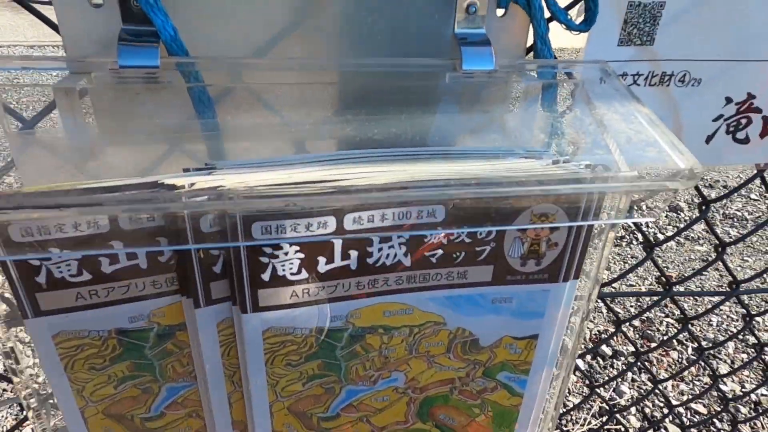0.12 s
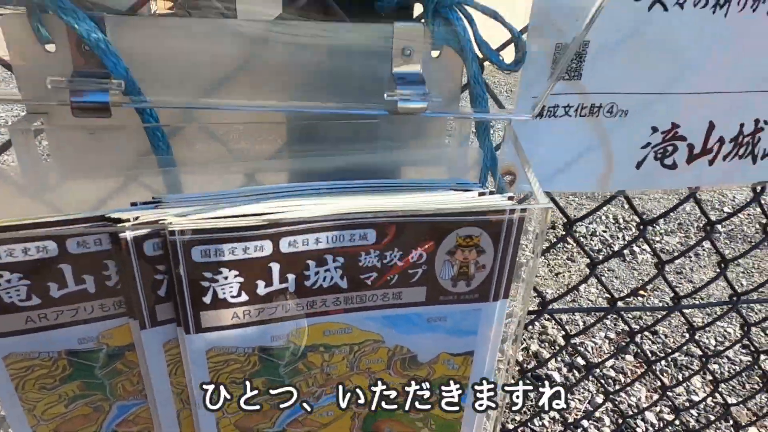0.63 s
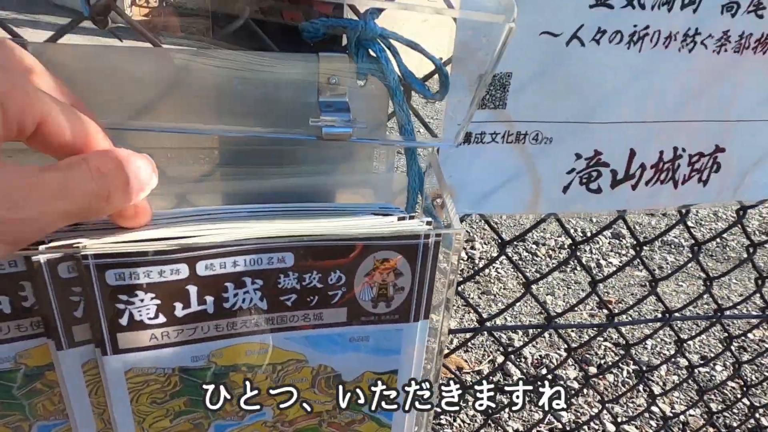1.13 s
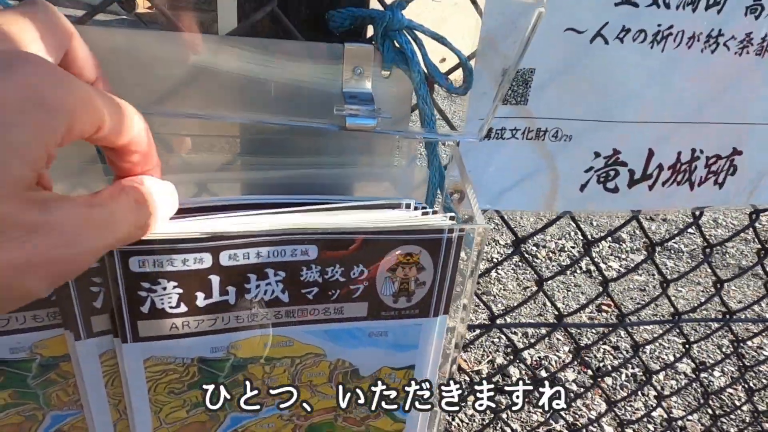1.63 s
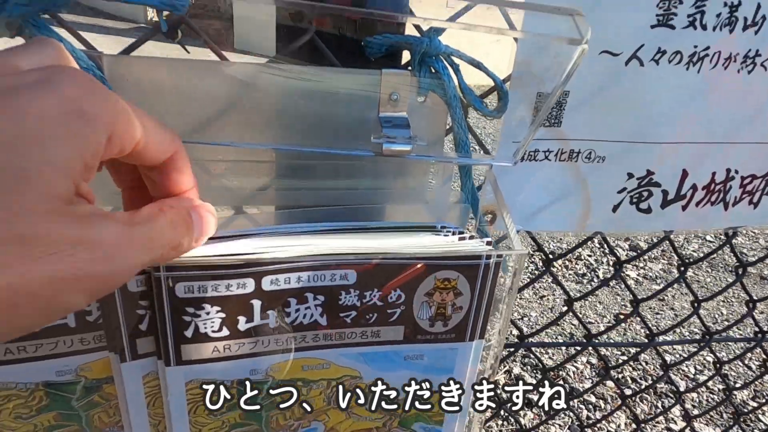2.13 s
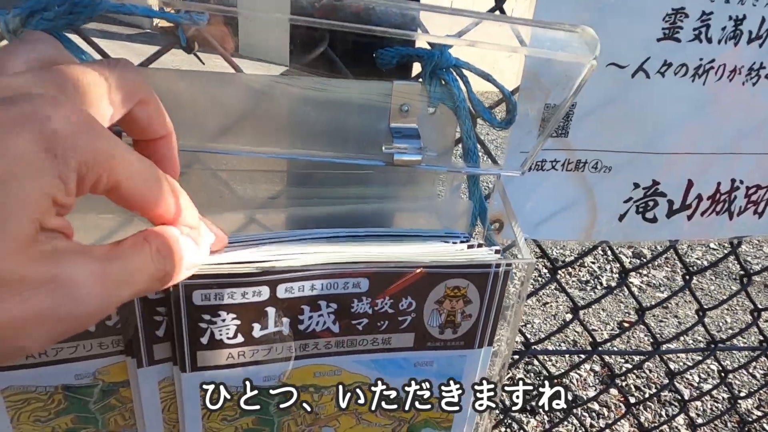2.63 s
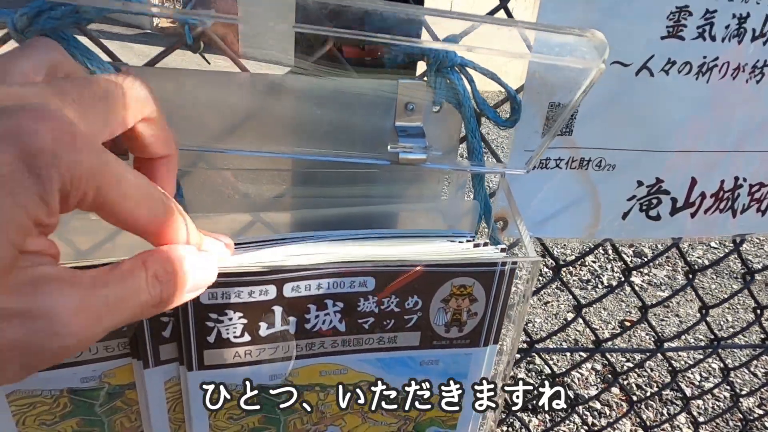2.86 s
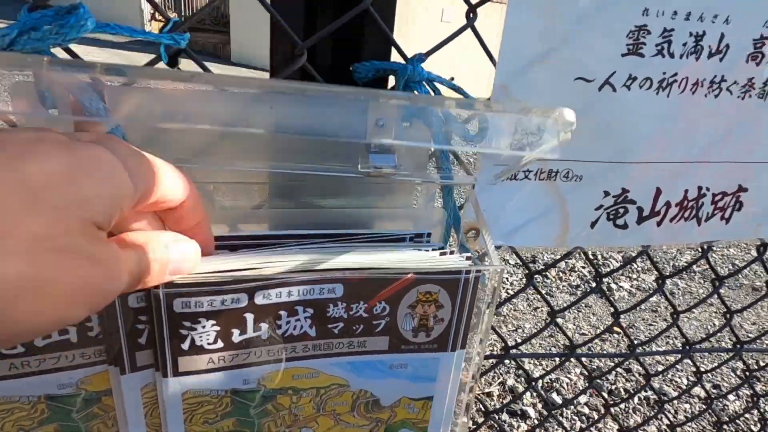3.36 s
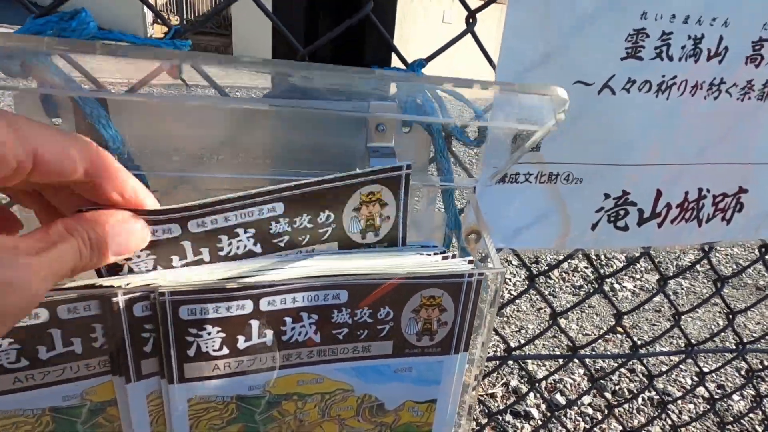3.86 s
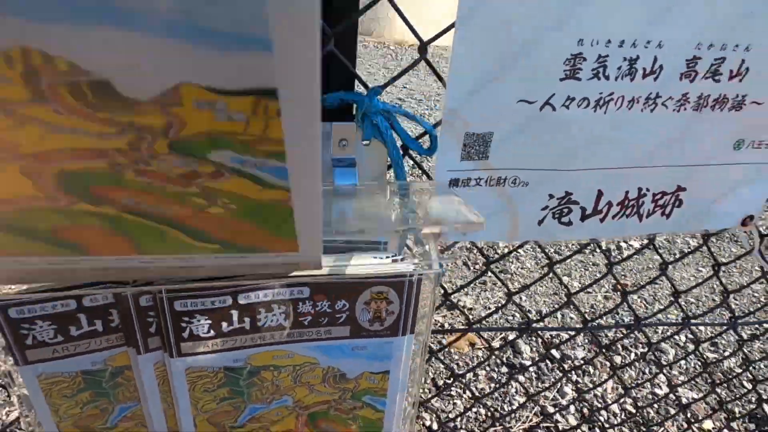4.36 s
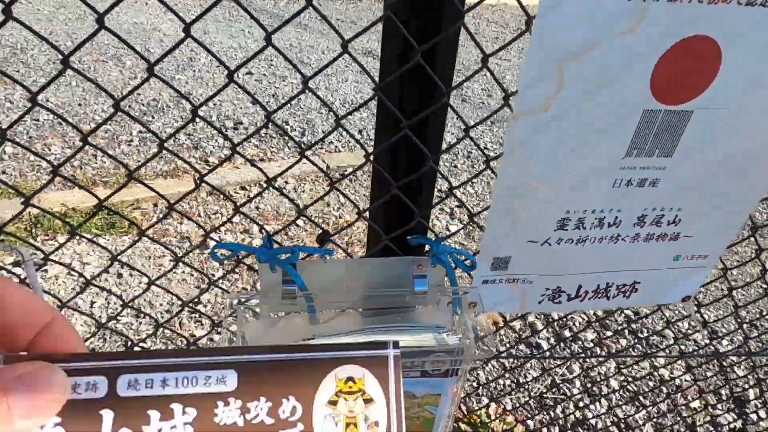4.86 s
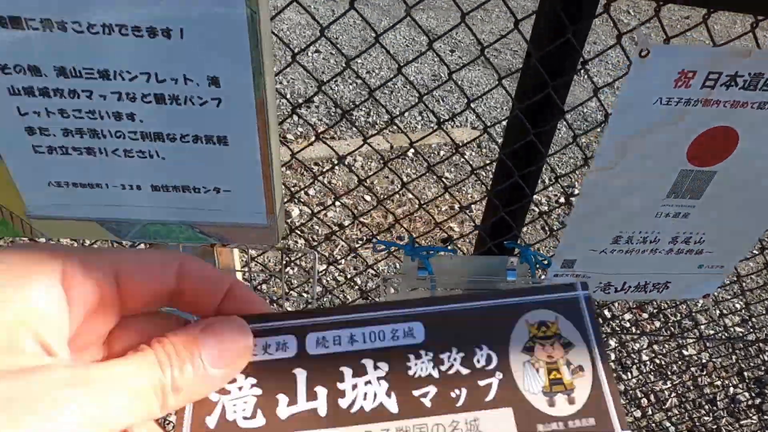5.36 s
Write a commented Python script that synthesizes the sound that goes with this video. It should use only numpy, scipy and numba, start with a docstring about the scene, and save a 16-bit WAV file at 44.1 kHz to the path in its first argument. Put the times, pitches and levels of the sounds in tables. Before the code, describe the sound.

Hollow plastic knocks and dry clicks as a leaflet is pulled from a lidded holder, over soft wind and a distant hum.

```python
"""Leaflet pulled from a lidded plastic box

A hand lifts the lid of a clear leaflet holder tied to a wire fence, fingers the stack and pulls a leaflet out.
Knocks ring decaying box modes; short dry clicks are filtered pulses; gritty noise slides, scrunches and scrapes.
Noise through moving resonances makes an edge chatter, the lid buzz and a hinge squeak and creak.
Underneath, filtered noise gives light wind on the microphone ports, a far motor hum and traffic wash.
"""
import sys
import numpy as np
from scipy import signal
from scipy.fft import rfft, irfft
from scipy.io import wavfile
from scipy.ndimage import uniform_filter1d
from numba import njit

SR = 44100
rng = np.random.default_rng(int(sys.argv[2]) if len(sys.argv) > 2 else 0)


def dump_mix(stems):
    """Bounce the given channels to the path in sys.argv[1] as a 16-bit WAV at rate SR."""
    frames = np.atleast_2d(stems).T  # one column per channel
    limited = np.clip(frames, -1, 1)  # hard clip at full scale
    pcm = np.round(limited * 32767).astype(np.int16)
    wavfile.write(sys.argv[1], SR, pcm)


def decibels_to_gain(level_db):
    """Convert a level in decibels to a linear amplitude gain (20 dB per decade)."""
    exponent = np.asarray(level_db, float) / 20
    return 10 ** exponent


N = 242550
T = np.arange(N) / SR

# wind on the ports: time_s, buffet_db, rumble_db
WIND = [(0, -41.5, -45), (.65, -44.5, -44), (.95, -64, -45), (1.45, -41.5, -50), (2.25, -47.5, -48),
        (2.65, -37.5, -50.5), (3.05, -41.5, -53), (3.4, -41, -45), (3.6, -43, -44), (3.85, -48.5, -45.5),
        (4.4, -41, -41.5), (4.55, -29.5, -42), (4.72, -39.5, -46), (4.95, -51.5, -49), (5.5, -46, -50)]
# far motor: time_s, pitch_hz, level_db
HUM = [(0, 233.6, -57), (.4, 214.2, -45.5), (1.3, 216.3, -50), (2.6, 252, -50.5), (3.6, 254, -71)]
# traffic wash spectrum, relative: freq_hz, density_db_per_hz
WASH = [(250, -17.5), (400, -15), (700, -29), (1100, -12.5), (1600, -20), (2600, -36.5), (7500, -40.5),
        (12000, -49.5)]
# jolts that set the loose lid buzzing on its hinges: time_s, low_ring_db, high_ring_db
LID_JOLTS = [(0.6, -57, -44.5), (0.714, -34.5, -39.5), (1.019, -47, -47.5)]
# thin hinge creak: time_s, pitch_hz, level_db
CREAK = [(3.12, 1090, -74), (3.18, 1223, -49.5), (3.24, 1120, -60), (3.31, 1095, -66)]
# skin or paper along the plastic: start_s, length_s, rub_db, hiss_db
STROKES = [(0.185, 0.17, -55, -63), (0.426, 0.344, -56.5, -61.5), (0.835, 0.378, -57.5, -63),
           (1.374, 0.046, -58, -64), (1.868, 0.23, -57.5, -71), (2.304, 0.051, -56, -62.5),
           (2.578, 0.0091, -52, -64), (3.238, 0.35, -62, -66), (3.737, 0.032, -57.5, -50),
           (3.874, 0.34, -52, -51.5), (4.286, 0.018, -34, -32.5), (4.382, 0.062, -47, -38.5),
           (4.486, 0.045, -45, -34), (4.647, 0.32, -52, -58.5), (5.02, 0.54, -56.5, -59.5)]
# rub resonances, relative levels: centre_hz, width_hz, level_db
RUB_PEAKS = [(1150, 1100, 1.5), (1694, 600, -25)]
# hiss resonances, relative levels: centre_hz, width_hz, level_db
HISS_PEAKS = [(3820, 1900, 11), (6360, 17000, 12)]
# leaflet scrunching against the box: loudest_s, level_db, width_s, centre_hz, glide_octaves_per_s
SCRUNCHES = [(2.197, -47, 0.025, 1400, -7), (3.522, -29.5, 0.016, 800, -12), (4.293, -32, 0.019, 1070, -5),
             (4.535, -22.5, 0.022, 2130, 0), (4.555, -27.5, 0.016, 865, -64), (4.613, -33, 0.02, 670, 6),
             (5.279, -30, 0.022, 1150, 8), (5.457, -26.5, 0.023, 995, -22)]
# box bumping the fence: start_s, level_db, pitch_hz
THUDS = [(0.686, -19.5, 107), (1.811, -12, 410), (1.821, -15.5, 120), (1.827, -13, 384),
         (1.926, -20.5, 109), (1.967, -16, 208), (2.616, -31, 390), (3.176, -30, 109), (3.521, -24.5, 219),
         (3.558, -27.5, 196), (3.755, -29.5, 345), (3.833, -26, 108), (4.284, -20, 215), (4.55, -17.5, 345),
         (4.572, -20.5, 131), (4.599, -22, 224)]
# the sliding leaflet's own band, climbing as less of it is left in the box: time_s, centre_hz, level_db
PULL = [(4.33, 5600, -62), (4.42, 6050, -44), (4.55, 6950, -40.5), (4.575, 7300, -65)]
# short dry clicks and ticks: start_s, peak_db, band_hz
CLICKS = [(0.868, -32.5, 3500), (2.047, -18.5, 1700), (2.06, -22.5, 1584), (2.348, -31, 2500),
          (2.497, -36.5, 1010), (2.586, -39, 3500), (3.446, -36.5, 900), (3.741, -29, 4000),
          (4.271, -23, 2000), (4.95, -30.5, 5000), (5.167, -30.5, 1500), (5.274, -24.5, 3000),
          (5.319, -24.5, 1300), (2.408, -34.5, 1000), (2.452, -26, 1090), (2.537, -31.5, 2500),
          (3.501, -23, 1883), (3.51, -17, 2200), (4.208, -10.5, 2500), (4.411, -8.5, 2500),
          (4.548, -9.5, 2400)]
# knocks on the box: start_s, peak_db, crack_db, spot_hz (pitch of the struck spot)
KNOCKS = [(0.405, -42, -32.5, 1550), (0.481, -18.5, -23, 818), (0.569, -31.5, -35.5, 1420),
          (0.611, -29, -32, 1480), (0.68, -17, -11.5, 1093), (0.695, -18.5, -38, 1065),
          (0.706, -28, -21, 1190), (0.727, -31, -31, 1085), (0.737, -31, -45, 2530),
          (0.764, -30.5, -37, 2530), (0.79, -26, -40, 1067), (0.801, -39, -38, 2530),
          (0.951, -35.5, -36, 1150), (0.974, -31.5, -26, 1160), (1.013, -27.5, -43, 724),
          (1.124, -32.5, -41.5, 1176), (1.2, -29, -28, 2210), (1.236, -38.5, -61, 1130),
          (1.411, -39, -42.5, 1580), (1.764, -37, -40, 1270), (1.808, -16.5, -21, 1043),
          (1.813, -10, -11, 1160), (1.897, -29.5, -33.5, 1020), (1.925, -26.5, -36, 1096),
          (1.942, -32, -40.5, 2500), (1.964, -10, -10, 1080), (1.968, -15, -42, 2600),
          (1.983, -25, -51, 1094), (2.077, -19, -31, 1920), (2.086, -32, -40, 1515),
          (2.616, -36.5, -41, 1150), (3.177, -33.5, -33.5, 1070), (3.468, -31, -35, 897),
          (3.473, -33.5, -29, 1480), (3.519, -18, -44, 733), (3.554, -21.5, -33, 700),
          (3.747, -30, -30, 1670), (3.83, -12, -14.5, 2760), (3.906, -26, -32, 1640),
          (4.052, -8.5, -19.5, 2220), (4.057, -9, -20.5, 2500), (4.132, -20, -13.5, 1530),
          (4.152, -27, -24.5, 2500), (4.208, -11.5, -14, 1150), (4.212, -10, -37, 2270),
          (4.222, -14, -37, 683), (4.281, -12.5, -15, 1020), (4.294, -10.5, -11.5, 1120),
          (4.313, -17, -16.5, 750), (4.344, -26.5, -50, 1950), (4.411, -16.5, -20, 1310),
          (4.639, -37, -34, 4100), (4.751, -39, -49, 4090) ]
# box modes, relative levels, decay before damping: mode_hz, level_db, undamped_t60_s
BOX_MODES = [(726.5, -2, 0.22), (959, -4, 0.23), (1111, -3, 0.12), (1480, 5.5, 0.012), (1954, -1.5, 0.011),
             (2220, -10, 0.028), (2500, 10.5, 0.024), (3122, -8, 0.074), (3325, 4, 0.014),
             (4060, 10.5, 0.02)]
# left minus right port: freq_hz, difference_db
PORTS = [(300, -1), (1200, -1), (2500, 1.5), (5000, -1.5), (10000, -3)]
# fluttering part, opposite in sign on the two ports: freq_hz, level_db
FLUTTER = [(200, -25), (2000, -12.5), (5000, -7.5), (10000, -10)]
# microphone response: freq_hz, gain_db
MIC = [(7500, -1), (8500, -11.5), (13000, -10), (16000, -23.5)]


def unit(x):
    """Scale to rms 1."""
    return x / np.sqrt(np.mean(x ** 2) + 1e-30)


def curve(rows):
    """Columns of a table, interpolated over time."""
    time_s, *columns = np.transpose(rows)
    return [np.interp(T, time_s, column) for column in columns]


def colour(x, points):
    """Weight a spectrum by (Hz, dB) points joined over log frequency."""
    hz, db = np.transpose(points)
    freq_hz = np.fft.rfftfreq(len(x), 1 / SR) + 1
    gain = decibels_to_gain(np.interp(np.log(freq_hz), np.log(hz), db))
    return irfft(rfft(x) * gain, len(x))


def band(x, lo_hz, hi_hz):
    """Band-pass, 12 dB per octave each side."""
    return signal.sosfilt(signal.butter(2, [lo_hz, hi_hz], "band", fs=SR, output="sos"), x)


@njit
def svf(x, hz, width_hz):
    """Resonance with a movable centre, gain 1 at the centre."""
    y, b, l = np.empty(len(x)), 0., 0.
    for i in range(len(x)):
        g, k = np.tan(np.pi * hz[i] / SR), width_hz / hz[i]
        v = (b + g * (x[i] - l)) / (1 + g * (g + k))
        b, l, y[i] = 2 * v - b, l + 2 * g * v, k * v
    return y


def ring(x, peaks):
    """Sum of fixed resonances (Hz, width Hz, dB)."""
    return sum(decibels_to_gain(db) * svf(x, np.full(N, 1. * hz), 1. * width_hz) for hz, width_hz, db in peaks)


def walk(rate_hz):
    """Slow random wander of rms 1."""
    hold = int(SR / rate_hz)
    steps = np.repeat(rng.standard_normal(N // hold + 1), hold)
    return unit(uniform_filter1d(uniform_filter1d(steps, hold), hold)[:N])


def grit(snags_per_s, spread_db):
    """Friction: noise with tiny snags of very uneven size."""
    size = decibels_to_gain(spread_db * np.minimum(rng.exponential(size=N), 4))
    snags = (rng.random(N) < snags_per_s / SR) * size
    return unit(rng.standard_normal(N) * (1 + uniform_filter1d(snags, size=40) * 40))


def swell(start_s, length_s, in_db_s, out_db_s):
    """Gain of a gesture that swells, holds and fades, evenly in dB."""
    before_s = np.maximum(start_s - T, 0)
    after_s = np.maximum(T - start_s - length_s, 0)
    return decibels_to_gain(-in_db_s * before_s - out_db_s * after_s)


def background(wash_db=-58.5):
    """Wind partly unlike on the two ports, a wavering hum with its lower octave and a smooth far wash."""
    buffet_db, rumble_db = curve(WIND)
    hum_hz, hum_db = curve(HUM)
    sides = np.array([[1], [-1]])
    noise = rng.standard_normal((6, N))
    buffet = band(band(noise[0] + 0.5 * sides * noise[1], 15, 73.3), 15, 73.3)
    buffet = unit(buffet) * decibels_to_gain(buffet_db + 1.4 * walk(0.99))
    rumble = unit(band(noise[2] + 0.11 * sides * noise[3], 46.7, 217.0)) * decibels_to_gain(rumble_db + 1.5 * walk(20))
    hum = decibels_to_gain(hum_db) * unit(svf(rng.standard_normal(N), hum_hz, 8.6))
    octave_below = decibels_to_gain(hum_db - 4.0) * unit(svf(rng.standard_normal(N), hum_hz / 2, 2.7))
    wash = decibels_to_gain(wash_db) * unit(colour(noise[4], WASH) + 0.7 * sides * colour(noise[5], WASH))
    return buffet + rumble + hum + octave_below + wash


def lid(rise_db_s=397, fade_db_s=219):
    """Grit shakes narrow resonances that wander as the lid flexes; buzz builds to each jolt and dies away."""
    low_gain, high_gain = sum(decibels_to_gain(np.array([[low_db], [high_db]])) * swell(s, 0, rise_db_s, fade_db_s)
                              for s, low_db, high_db in LID_JOLTS)
    shake = grit(90, 1.2) * decibels_to_gain(2.5 * walk(40))
    flex = 1 + 0.008 * walk(13)
    high = 0
    for hz, width_hz, db in [(2530, 97.0, -5.5), (4150, 480.0, -6.5)]:
        gain = decibels_to_gain(db + 4.8 * walk(30.8))
        high = high + gain * svf(shake, hz * (1 + 0.019 * walk(13.9)), width_hz)
    return low_gain * unit(svf(shake, 1120 * flex, 44.0)) + high_gain * unit(high)


def squeak(start_s=0.422, length_s=0.037, level_db=-51, edge_db_s=1500):
    """Hinge: noise in a narrow band, first a short breathy squeak, later a thin creak that arches in pitch."""
    creak_hz, creak_db = curve(CREAK)
    creak = unit(svf(svf(rng.standard_normal(N), creak_hz, 35.0), creak_hz, 35.0))
    creak = decibels_to_gain(creak_db) * creak * (T > CREAK[0][0]) * (T < CREAK[-1][0])
    gain = decibels_to_gain(level_db) * swell(start_s, length_s, edge_db_s, edge_db_s)
    return creak + gain * unit(ring(rng.standard_normal(N), [(7200, 520, 0)]))


def chatter(start_s=4.64, length_s=0.2745, level_db=-47, edge_db_s=1500,
            start_hz=1836, sag_hz_s=700, slips_per_s=42.0):
    """Uneven stick-slip puffs: a strand sinks and wavers as the edge moves, between two rings of the box."""
    hz = start_hz - sag_hz_s * np.clip(T - start_s, 0, length_s)
    hz = hz * (1 + 0.016 * walk(25))
    slips = 0.6 + np.cos(np.pi * slips_per_s * T + walk(12)) ** 4
    puffs = rng.standard_normal(N) * slips
    strand = svf(svf(puffs, hz, 200.), hz, 200.)
    box = ring(puffs, [(1160, 79, -9), (2540, 170, -10)])
    gain = decibels_to_gain(level_db) * swell(start_s, length_s, edge_db_s, edge_db_s)
    return gain * unit(strand + box)


def slide(in_db_s=232, out_db_s=443):
    """Skin and paper on plastic: a gritty rub in the box and a hiss whose colours flutter apart."""
    rub_gain, hiss_gain = sum(decibels_to_gain(np.array([[rub_db], [hiss_db]])) * swell(s, length_s, in_db_s, out_db_s)
                              for s, length_s, rub_db, hiss_db in STROKES)
    rub = unit(band(ring(grit(63, 2.5), RUB_PEAKS), 920, 4300)) * decibels_to_gain(1.5 * walk(21.9))
    hiss = sum(ring(grit(120, 1.5), [peak]) * decibels_to_gain(3.0 * walk(30)) for peak in HISS_PEAKS)
    return rub * rub_gain + unit(band(hiss, 1600, 18000)) * hiss_gain


def scrunch():
    """Dense creases in a short bell-shaped burst, ringing around a centre that glides with the fold."""
    out, creases = 0, band(grit(810, 0.22), 142, 1840)
    for s, db, width_s, centre_hz, glide_oct_s in SCRUNCHES:
        hz = centre_hz * 2 ** (glide_oct_s * np.clip(T - s, -width_s, width_s))
        bell = np.exp(-((T - s) / width_s) ** 2)
        ringing = svf(svf(creases, hz, 0.84 * centre_hz), hz, 1. * centre_hz)
        out = out + bell * decibels_to_gain(db) * unit(ringing + 0.54 * creases)
    return out


def thuds(decay_cycles=1.86):
    """A soft push on a large panel: a few low cycles that die away."""
    out = np.zeros(N)
    for s, db, hz in THUDS:
        cycles = hz * np.maximum(T - s, 0)
        out += decibels_to_gain(db) * np.sin(2 * np.pi * cycles) * np.exp(-cycles / decay_cycles)
    return out


def pull():
    """Scraping grit through a band that rises while the leaflet comes free."""
    hz, db = curve(PULL)
    scrape = unit(svf(grit(200, 2.5), hz, 1300.))
    return decibels_to_gain(db + 2.8 * walk(45)) * scrape * (T > PULL[0][0]) * (T < PULL[-1][0])


def clicks(sharp_ms=0.32, tail_db=-14, tail_ms=3.0):
    """One sharp pulse through a gentle band less than an octave wide around band_hz, then a brief scratchy
    tail."""
    out, t = np.zeros(N + 2048), np.arange(1500) / SR
    for s, db, hz in CLICKS:
        tail = decibels_to_gain(tail_db) * rng.standard_normal(len(t)) * np.exp(-t * 1000 / tail_ms)
        click = tail - np.exp(-t * 1000 / sharp_ms)
        click = signal.sosfilt(signal.butter(1, [0.66 * hz, 1.2 * hz], "band", fs=SR, output="sos"), click)
        i = int(s * SR)
        out[i:i + len(t)] += decibels_to_gain(db) * click / abs(click).max()
    return out[:N]


def box_modes(t, peak_db, crack_db, spot_hz, damp=0.44, focus_db=6, soft=0.21, under_db=3):
    """Impulse response of the box's strong modes, boosted near the struck spot."""
    hz, db, t60_s = np.array(BOX_MODES).T[:, :, None]
    chance = rng.standard_normal((2, len(hz), 1))
    near_db = focus_db * np.exp(-(np.log(hz / spot_hz) / 0.11) ** 2)
    # a soft blow hardly reaches the high modes
    near_db = near_db + soft * (crack_db - peak_db) * np.maximum(np.log2(hz / spot_hz), 0)
    # modes well under the spot stay quiet
    near_db = near_db - under_db * np.maximum(np.log2(spot_hz / hz), 0)
    gain = decibels_to_gain(db + near_db + 2.5 * chance[0])
    decay = 1000 ** (-t / np.minimum(damp * t60_s, 0.075))
    return (gain * np.sin(2 * np.pi * hz * (1 + 0.011 * chance[1]) * t) * decay).sum(0)


def knocks(tick=3, rise_ms=0.12, rattle_ms=3.45, rattle_spread=0.3, longer=0.14,
           blur_gain=5.0, blur_t60_s=0.052, spot_db=-3, dull_db=14, spot_t60_s=0.04):
    """Each blow ticks, rattles the longer the harder it is, rings the box most near the spot and cracks."""
    out, t = np.zeros(N + 8192), np.arange(6000) / SR
    for s, peak_db, crack_db, spot_hz in KNOCKS:
        # rattle_ms is the typical decay constant of a -17 dB blow
        ms = rattle_ms * decibels_to_gain(longer * (peak_db + 17.0)) * np.exp(rattle_spread * rng.standard_normal())
        noise = rng.standard_normal((3, len(t)))
        contact = (1 - np.exp(-t * 1000 / rise_ms)) * np.exp(-t * 1000 / max(ms, 0.2))
        rattle = noise[:2] * contact - tick * (t < 2 / SR)
        # many faint modes blur into a short noisy tail around the spot
        blur = band(band(noise[2], 0.42 * spot_hz, 2.48 * spot_hz), 230, 2700)
        blur = blur_gain * blur * 1000 ** (-t / blur_t60_s)
        # low spots are held by the paper and hardly sing
        spot_gain = decibels_to_gain(spot_db - dull_db * max(np.log2(1060 / spot_hz), 0))
        spot = spot_gain * np.sin(2 * np.pi * spot_hz * t)
        spot = spot * 1000 ** (-t / spot_t60_s) * (1 - np.exp(-t * 1000))
        response = box_modes(t, peak_db, crack_db, spot_hz) + blur
        body = signal.fftconvolve(rattle[0], response)[:len(t)]
        body = body / abs(body).max() + spot
        crack = band(rattle[1], 2500, 8260)
        i = int(s * SR)
        out[i:i + len(t)] += decibels_to_gain(peak_db) * body / abs(body).max() + decibels_to_gain(crack_db) * crack / abs(crack).max()
    return out[:N]


def scene(lag_samples=0.65):
    """The right port faces the box and hears it early; a randomly fluttering part differs left to right."""
    near = lid() + squeak() + chatter() + slide() + scrunch() + thuds() + pull() + clicks() + knocks()
    flutter = colour(near, FLUTTER) * walk(200)
    left = colour(near, [(hz, db / 2) for hz, db in PORTS])
    left = (1 - lag_samples) * left + lag_samples * np.roll(left, shift=1)
    right = colour(near, [(hz, -db / 2) for hz, db in PORTS])
    return np.array([left + flutter, right - flutter]) + background()


def band_limit(x):
    """A steep low-pass at the top of the band."""
    return signal.sosfilt(signal.butter(12, 15980, fs=SR, output="sos"), x)


def record(dry):
    """A small microphone that dulls above 7.5 kHz."""
    mix = np.array([colour(port, MIC) for port in dry])
    return band_limit(mix)


dry = scene()
out = record(dry)
dump_mix(out)
```